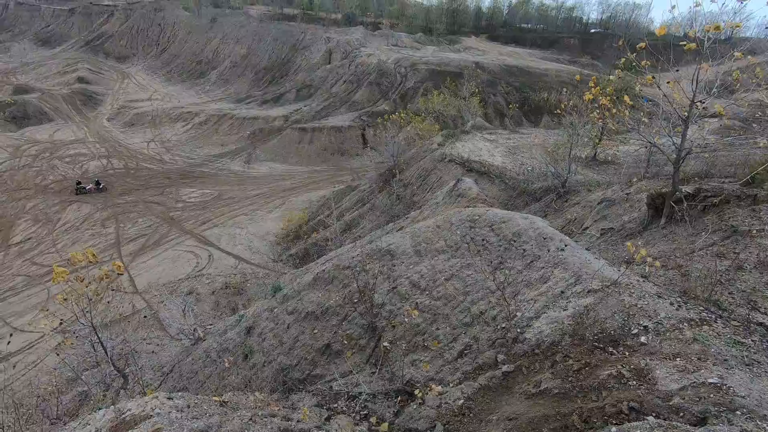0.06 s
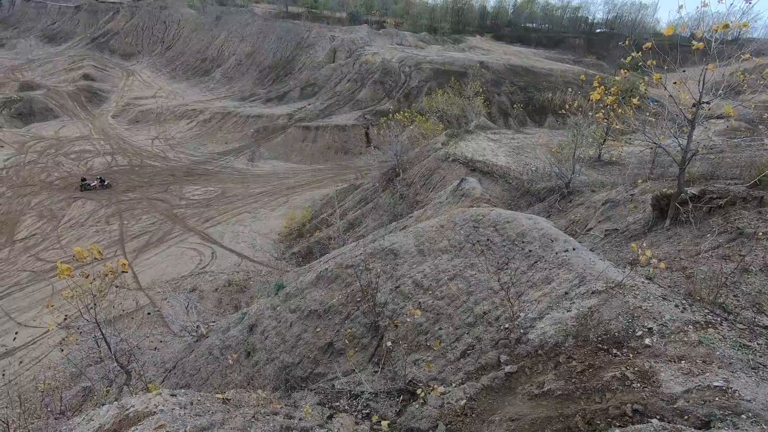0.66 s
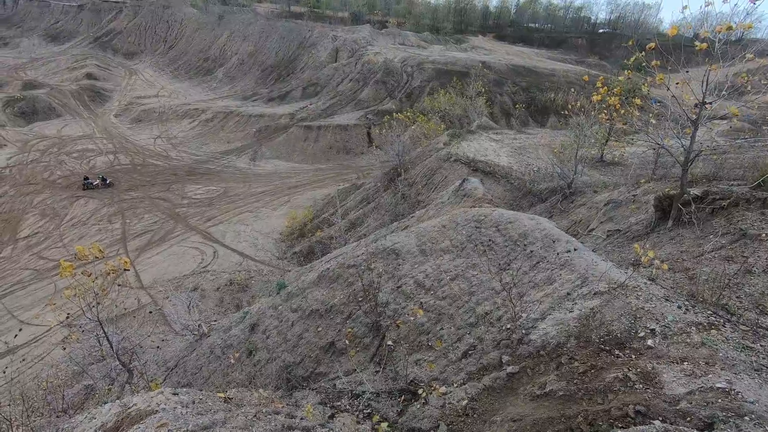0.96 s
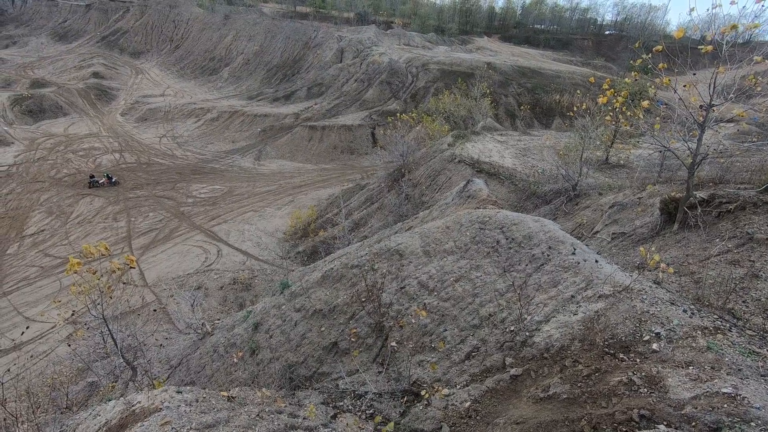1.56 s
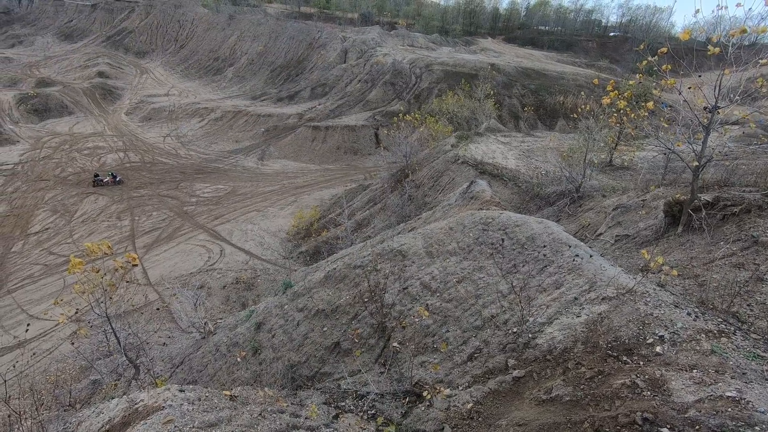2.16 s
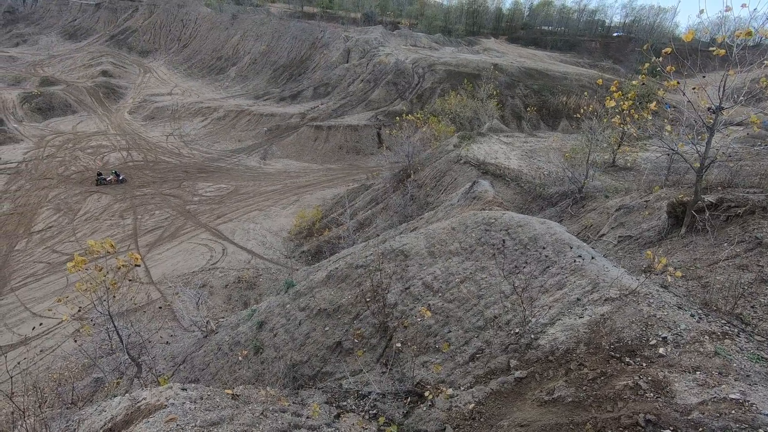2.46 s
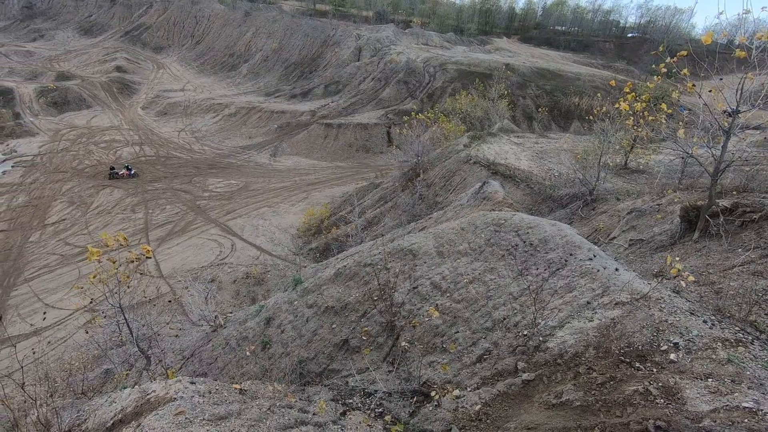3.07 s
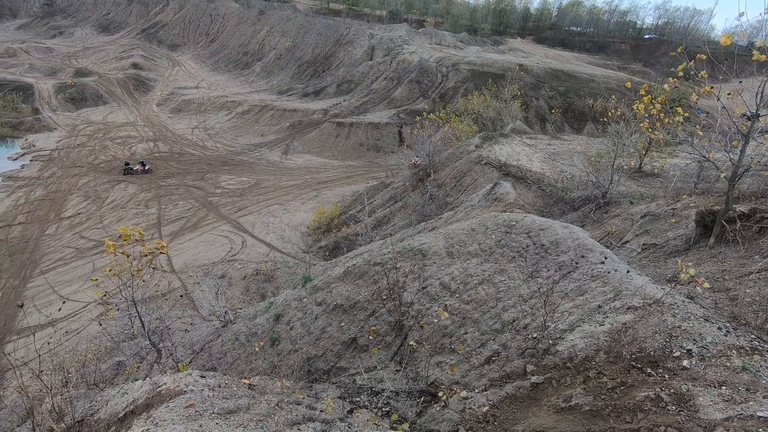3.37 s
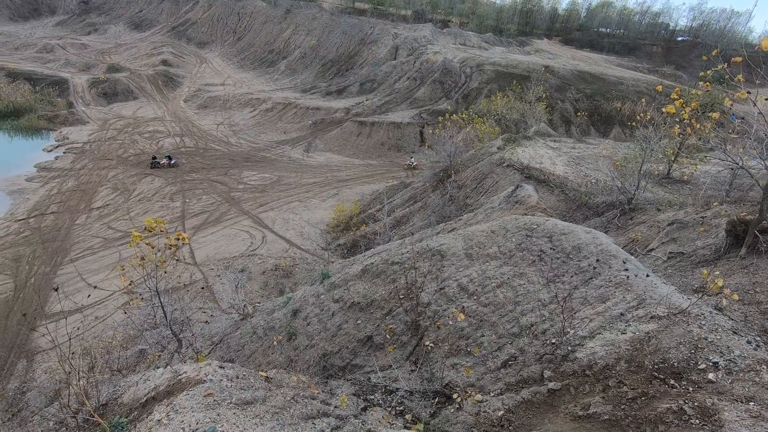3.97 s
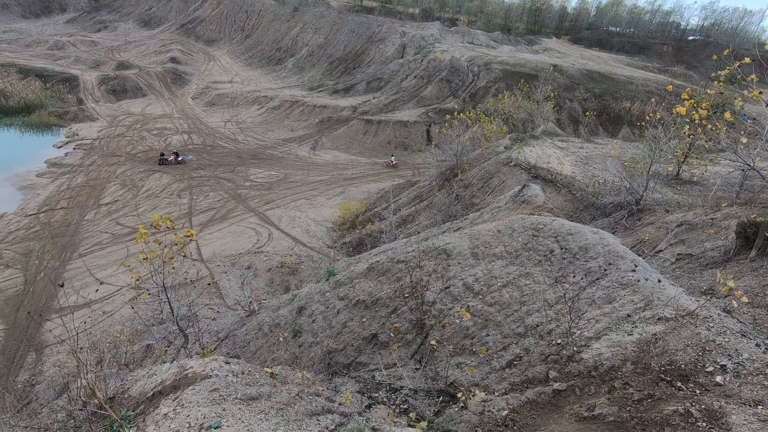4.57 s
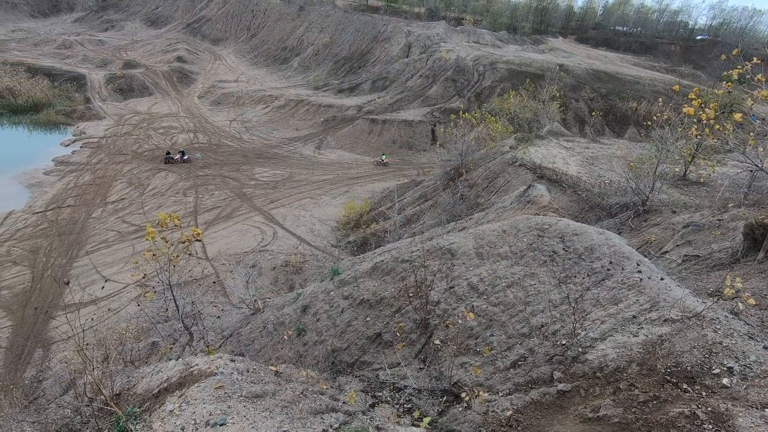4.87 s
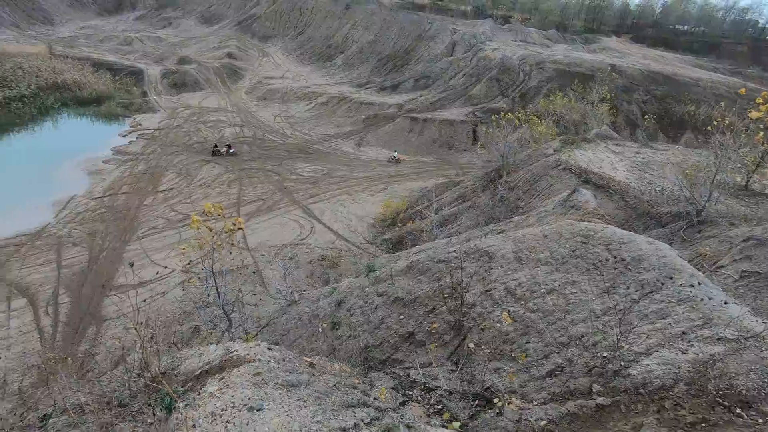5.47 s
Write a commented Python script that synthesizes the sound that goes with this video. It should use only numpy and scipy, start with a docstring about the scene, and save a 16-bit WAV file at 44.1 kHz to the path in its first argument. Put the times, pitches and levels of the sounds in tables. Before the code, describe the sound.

Low, gusty wind rumbles and flutters on the microphone throughout, above an open sand pit. A distant dirt bike putters on the right, its rapid pops echoing lightly off the slopes, then drops away at about 1.3 seconds. A quad, also on the right, sputters briefly around 1.5 seconds. The bike revs up near 2.2 seconds, along with one tiny clink of stone on metal. From 2.4 to 3.3 seconds the quad returns with uneven, nasal barks, bogging down and rattling on. From about 3.3 seconds the bike gives a string of quick throttle blips, its pitch wavering. It grows louder and raspier from 4 seconds, with brief metallic rings in the exhaust, blares hardest around 5.3 seconds and cuts for an instant near 5.5. Underneath, a far-off buggy's muffled hum fades in and out.

```python
"""A dirt bike putters and revs far below in a sand pit, while wind rumbles on the microphone.
Each time an engine fires, one sharp pop rings in its exhaust pipe and scatters off the sandy slopes.
Blips of the throttle speed the bike up; under load its pops harden and wake metallic rings.
A quad joins in twice, a stone clinks once and a buggy hums further off.
The bike and quad are to the right, so the camera's body shields the left microphone from them."""
import sys
import numpy as np
from scipy import signal
from scipy.fft import rfft, irfft, next_fast_len
from scipy.io import wavfile
from scipy.ndimage import uniform_filter1d, map_coordinates

SR = 44100
rng = np.random.default_rng(int(sys.argv[2]) if len(sys.argv) > 2 else 0)


def dump(signal):
    """Clip the signal to [-1, 1] and save it as 16-bit WAV at the path in sys.argv[1]."""
    limited = np.clip(np.atleast_2d(signal).T, -1, 1)
    pcm = np.round(limited * 32767).astype(np.int16)
    wavfile.write(sys.argv[1], SR, pcm)


N = 247842


def bike():
    """One cylinder: soft booms at light throttle; under load each sharp pop blares and rasps."""
    # engine speed before blips: time_s, firings_per_s
    speed = [(0.0, 50.8), (0.35, 52.35), (0.6, 50.25), (0.72, 51.47), (0.9, 49.55), (1.05, 50.78),
             (1.25, 52.87), (1.95, 51.56), (2.8, 56.51), (3.1, 59.97), (3.47, 58.07), (3.75, 59.22),
             (3.97, 58.01), (4.1, 55.1), (4.28, 52.62), (4.6, 53.01), (5.05, 52.81), (5.62, 52.49)]
    # brief twists of the throttle: peak_s, length_s, extra_firings_per_s
    blips = [(2.193, 0.448, 15.141), (3.347, 0.235, 10.628), (3.613, 0.277, 7.292), (3.855, 0.186, 3.398),
             (4.018, 0.13, 3.0), (4.168, 0.144, 1.721), (4.357, 0.156, 2.506), (4.456, 0.166, 4.763),
             (4.77, 0.339, 3.931), (5.34, 0.568, 3.888)]
    # the pipe's own note: time_s, pitch_hz
    pipe_note = [(0, 716), (.3, 558), (.6, 605), (.85, 680), (1.25, 676), (1.8, 1107), (2.3, 869),
                 (3.4, 790), (3.75, 646)]
    # how hard the engine works: time_s, boom_db, treble_over_boom_db
    effort = [(0, -46.5, -2), (.17, -51.5, 0), (.3, -43, -5), (.5, -41, -6), (.7, -39.5, -9),
              (.85, -36.5, -14), (1.04, -38, -10), (1.235, -42, -13.5), (1.28, -64, 1.5),
              (1.6, -57.5, -9.5), (1.85, -56.5, -26), (2.1, -44, -19.5), (2.35, -41.5, -14.5),
              (3.4, -41, -17), (3.62, -37, -16.5), (3.78, -36, -15.5), (4.06, -33, -8), (4.28, -37, -9),
              (4.5, -34.5, -8.5), (4.65, -37.5, -7.5), (4.8, -37, -10.5), (5, -37, -10.5),
              (5.32, -33, -5.5), (5.62, -38, -8.5)]
    # throttle: time_s, opening (0 light, 1 loaded, 2 wide open), upper_notes_db
    throttle = [(3.3, 0.059, -0.5), (3.68, 0.65, -2.5), (3.8, 1.18, -3), (4.1, 0.8, -1.5), (4.5, 0.59, 4),
                (4.75, 1.19, 2), (5.02, 1.14, 0.5), (5.17, 2, 1), (5.42, 1.5, 0), (5.62, 2.16, -4.5)]
    # tone colours of a pop's four parts, dull to sharp: pitch_hz, level_db
    boom_tone = [(300, -26.5), (450, -1), (570, 5.5), (950, 1), (1170, 2.5), (1400, -19.5), (3000, -32.5)]
    honk_tone = [(400, -20.5), (800, -8), (1130, 3.5), (1400, 2.5), (1700, -4.5), (3000, -26)]
    rasp_tone = [(1200, -22.5), (2000, 0), (2400, 0), (3200, -6.5), (3900, -6.5), (4600, -11.5),
                 (6000, -22.5), (8000, -44.5)]
    sizzle_tone = [(2500, -22.5), (4300, -3), (5000, 1), (6000, 0), (6700, -7), (7400, -10), (8300, -40)]
    effort_db, hard_db = curves(effort)
    opening, upper_db = curves(throttle)
    light, loaded, wide = (np.clip(1 - np.abs(opening - state), 0, 1) for state in range(3))
    cut = bump(peak_s=5.468, length_s=.115)  # the rider snaps the throttle shut for an instant
    surge = sum(extra * bump(s, length) for s, length, extra in blips)
    full_load_db, blip_dip_db = -31.5, -2
    load = np.minimum(amp(effort_db - full_load_db), 1)
    blip_db = blip_dip_db * load * sum(bump(s, length) for s, length, _ in blips)
    level_db = effort_db - 14 * cut
    soft_db = level_db + 0.15 * blip_db
    sharp_db = level_db + hard_db + blip_db
    gain = lambda db, sharp_share: amp(db + soft_db + sharp_share * (sharp_db - soft_db))
    fired = firings(curves(speed)[0] + surge - 13 * cut, jitter_s=.00004)
    pipe_hz = curves(pipe_note)[0][fired.astype(int)] * (1 + 0.0025 * rng.standard_normal(len(fired)))
    boom = amp(soft_db) * ring(booms(fired, pipe_hz, cycles=0.65, scatter_db=1.7), boom_tone)
    released = fired + .0012 * SR  # the gas bursts out as the boom peaks
    honk = ring(pops(released, pipe_hz, echo=0.27, scatter_db=3), honk_tone)
    honk *= gain(db=-8, sharp_share=0.75)
    pulses = -pops(released, pipe_hz, echo=0, scatter_db=1.56, count=1)
    blare = amp(soft_db) * pipe_blare(pulses, loaded, wide, upper_db)
    gas = pops(released, pipe_hz, echo=0.72, scatter_db=2.9)
    crack = ring(pulses, rasp_tone)
    rasp = gain(db=-3.5, sharp_share=0.88) * (jet(gas, rasp_tone, life_s=0.001) + crack)
    sizzle = gain(db=-10, sharp_share=0.84) * jet(gas, sizzle_tone, life_s=0.001)
    return light * (boom + honk) + blare + rasp + sizzle + metallic_rings(gas)


def pipe_blare(pulses, loaded, wide, upper_db):
    """Sharp pulses ring many of the pipe's notes at once; upper_db lifts or lowers the high ones."""
    # the pipe's notes under load and wide open: pitch_hz, level_db
    loaded_tone = [(250, -24.5), (450, -9.5), (590, 2), (720, 0.5), (810, -5.5), (890, -1.5), (1000, -17),
                   (1200, -3.5), (1390, -10), (1500, -7), (1650, -14), (1850, -9), (2200, -16.5),
                   (3000, -29.5), (7000, -40.5)]
    wide_tone = [(250, -25), (450, -9), (600, 1), (700, -3.5), (820, -18), (1050, -1), (1200, -2),
                 (1400, -15.5), (1650, -4.5), (1880, -6.5), (2150, -12.5), (2500, -21.5), (7000, -39)]
    notes = amp(3) * loaded * ring(pulses, loaded_tone) + amp(4.5) * wide * ring(pulses, wide_tone)
    upper = filtered(notes, lambda hz: hz ** 8 / (hz ** 8 + 1000 ** 8))
    return notes + (amp(upper_db) - 1) * upper


def metallic_rings(pulses):
    """As the load shifts, gas puffs wake one note of the exhaust after another: a growl, a ring."""
    # spells of ringing: peak_s, length_s, pitch_hz, width_hz, level_db
    spells = [(0.363, 0.75, 2330, 500, -52.5), (.52, .26, 3850, 900, -49.5), (0.663, 0.41, 3920, 900, -48),
              (0.75, 0.27, 2820, 397, -48.5), (2.02, .75, 1114, 130, -55), (4.17, 0.44, 882, 89, -41.5),
              (4.758, .26, 1830, 504, -45.5), (3.615, 0.47, 3930, 706, -55.5),
              (3.82, 0.23, 3890, 910, -48.5), (4.093, 0.31, 5340, 1600, -48.5),
              (4.449, 0.34, 5670, 1010, -51.5), (4.455, .13, 3600, 1520, -43.5),
              (4.777, .24, 2900, 1200, -44.5), (5.61, .12, 3690, 700, -44)]
    out = np.zeros(N)
    for s, length, hz, width_hz, db in spells:
        b, a = signal.iirpeak(hz, hz / width_hz, SR)
        tone = signal.lfilter(b, a, signal.lfilter(b, a, puffs(pulses, life_s=.0004)))
        out += amp(db) * bump(s, length) * unit(tone)
    return out


def quad():
    """A slower engine with uneven, nasal pops: it sputters once, then barks, bogs down and rattles on."""
    # engine speed: time_s, firings_per_s
    speed = [(1.411, 46.06), (1.534, 43.35), (2.367, 46.58), (2.521, 52.07), (2.623, 42.08), (2.716, 46.75),
             (2.92, 29.51), (3.157, 42.87), (3.334, 48.35)]
    # how hard the engine works: time_s, boom_db, bark_db
    effort = [(1.42, -54, -54), (1.6, -47, -44), (2.36, -39, -50), (2.55, -39, -45), (2.68, -44, -37),
              (2.75, -42.5, -43), (2.8, -42, -37), (2.86, -40, -42.5), (2.93, -45.5, -45), (3, -40.5, -40),
              (3.07, -44, -44.5), (3.135, -44, -42), (3.22, -40.5, -48.5), (3.33, -49, -49)]
    # two bursts of throttle: start_s, end_s
    bursts = [(1.418, 1.628), (2.365, 3.34)]
    # tone colours of a pop's three parts, dull to sharp: pitch_hz, level_db
    boom_tone = [(250, -24.5), (450, -11), (620, 4.5), (780, 5), (1050, -1), (1400, -27), (3000, -46.5)]
    bark_tone = [(700, -30.5), (1300, -2), (1600, 6.5), (1950, 4.5), (2400, -3), (3200, -13.5),
                 (6000, -33.5)]
    rasp_tone = [(1200, -32.5), (2400, 13.5), (3200, 6.5), (3900, 6), (4800, 3.5), (6000, -1.5),
                 (7000, -14.5), (8200, -44)]
    t = np.arange(N) / SR
    boom_db, bark_db = curves(effort)
    fired = np.maximum(firings(curves(speed)[0], jitter_s=0.0003) - .0008 * SR, 0)
    pipe_hz = 590 * (1 + 0.071 * rng.standard_normal(len(fired)))
    boom = ring(pops(fired, pipe_hz, echo=0.47, scatter_db=1.1), boom_tone)
    gas = pops(fired, pipe_hz, echo=0.75, scatter_db=1.1)
    bark = unit(ring(gas, bark_tone) + amp(-1) * jet(gas, bark_tone, life_s=0.0008))
    rasp = jet(gas, rasp_tone, life_s=0.0012)
    is_open = sum(1. * (t > start) * (t < end) for start, end in bursts)
    throttle = uniform_filter1d(is_open, size=900)
    return throttle * (amp(boom_db) * boom + amp(bark_db) * (bark + amp(-8) * rasp))


def firings(rate, jitter_s):
    """The moments, in samples, at which an engine fires, each slightly early or late."""
    count = np.cumsum(rate) / SR
    fired = np.interp(np.arange(1, int(count[-1]) + 1), count, np.arange(N))
    return np.clip(fired + jitter_s * SR * rng.standard_normal(len(fired)), 0, N - 1)


def booms(fired, pipe_hz, cycles, scatter_db):
    """Each firing sounds the pipe's lowest note, which swells and dies within a few cycles."""
    age = np.arange(SR // 50)
    turns = pipe_hz[:, None] * age / SR
    size = amp(scatter_db * rng.standard_normal((len(fired), 1)))
    bursts = size * np.sin(2 * np.pi * turns) * turns * np.exp(-turns / cycles)
    where = np.round(fired).astype(int)[:, None] + age
    return np.bincount(where.ravel(), bursts.ravel(), N)[:N]


def pops(fired, pipe_hz, echo, scatter_db, count=4):
    """One pulse a firing, followed by its weakening round trips in the pipe."""
    size = amp(scatter_db * rng.standard_normal(len(fired)))
    trips = np.arange(count)[:, None]
    where = np.round(fired + trips * SR / pipe_hz).astype(int)
    heights = size * echo ** (trips * (trips + 1) / 2)
    return np.bincount(where.ravel(), heights.ravel(), N)[:N]


def puffs(pulses, life_s):
    """Each pop drives a short, hissing puff of gas."""
    t = np.arange(SR // 50) / SR
    return signal.fftconvolve(pulses, np.exp(-t / life_s))[:N] * rng.standard_normal(N)


def jet(pulses, tone, life_s):
    """The puffs of gas, coloured by the exhaust pipe."""
    return ring(puffs(pulses, life_s), tone)


def wind():
    """Slow buffets, quicker flutter and fine swirls on the microphone, over the hush of the pit."""
    # wind strength and flutter strength: time_s, level_db
    strength = [(0, -1), (.82, -4.5), (1, 3.5), (1.35, -1.5), (1.6, 4), (1.9, -5), (2.4, 0.5), (3.1, 1.5),
                (3.6, -1.5), (3.85, -5), (4.13, 4), (4.7, 1), (5.42, 0), (5.62, -1)]
    flutter_level = [(0, -26.5), (1.4, -24), (2.3, -25.5), (3.1, -22), (3.7, -25), (4.2, -30.5),
                     (4.65, -26.5), (5, -23.5), (5.62, -27.5)]
    # brief lulls: middle_s, depth_db
    lulls = [(.19, 8), (1.25, 2.5), (1.86, 5.5), (2.31, 3), (3.45, 4.5), (3.68, 0), (4.3, 7.5),
             (4.709, 5.5), (5.51, 3)]
    # gusts that stir up swirls: peak_s, boost_db
    gusts = [(0.152, 5), (.5, 4), (0.901, 2.5), (1.7, 3.5), (2.619, 7.5), (3.78, 6.5), (4.552, 7.5), (5, 4)]
    # tone colours of the wind's three parts and the open air: pitch_hz, level_db
    buffet_tone = [(8, -25.5), (20, -15), (33, -0.5), (60, 2), (78, -4), (105, -13.5), (160, -32.5),
                   (400, -87.5)]
    flutter_tone = [(50, -16.5), (95, 7), (145, 2.5), (175, -9.5), (250, -19), (500, -75.5)]
    swirl_tone = [(100, -13.5), (190, 1), (250, -4.5), (320, -7.5), (420, -14), (560, -30.5), (1200, -50.5),
                  (3000, -88.5)]
    air_tone = [(200, -10), (600, -0.5), (1100, -3.5), (2000, -10.5), (4000, -19.5), (6200, -23.5),
                (7100, -31), (7900, -61.5)]
    strength_db, = curves(strength)
    lull_db = sum(db * bump(s, length_s=0.14) for s, db in lulls)
    gust_db = sum(db * bump(s, length_s=0.44) for s, db in gusts)
    gust_db -= 0.25 * np.arange(N) / SR  # the swirls slowly ease off
    blow = lambda db, follows, waver_db: amp(
        db + follows * (strength_db - lull_db) + waver_db * wobble(9.3))
    buffet = blow(db=-18, follows=0.83, waver_db=2.4) * eddies(buffet_tone, side_db=-21, evenness=0.89)
    flutter_db = curves(flutter_level)[0] - 0.74 * lull_db
    flutter = amp(flutter_db) * eddies(flutter_tone, side_db=-18.5, evenness=1)
    swirl_gain = blow(db=-37.5, follows=0.4, waver_db=0.37) * amp(gust_db)
    swirl = swirl_gain * eddies(swirl_tone, side_db=-6.5, evenness=0.18)
    air = amp(-49.5) * np.array([noise(air_tone), noise(air_tone)])
    return buffet + flutter + swirl + air


def eddies(tone, side_db, evenness):
    """Wind noise, much the same left and right, with its strongest swells flattened."""
    middle = noise(tone)
    swell = np.sqrt(np.abs(uniform_filter1d(middle ** 2, size=3000)) + 1e-6)
    middle = unit(middle / swell ** evenness)
    side = amp(side_db) * noise(tone)
    return np.array([middle + side, middle - side])


def clink():
    """A small stone is flung against metal and rings briefly."""
    start_s, pitch_hz, fade_s, level_db = 2.148, 2850, .03, -41
    age_s = np.maximum(np.arange(N) / SR - start_s, 0)
    return amp(level_db - 60 * age_s / fade_s) * np.sin(2 * np.pi * pitch_hz * age_s)


def buggy():
    """A muffled engine far off: only its lowest tones arrive, fading in and out on the wind."""
    # the cruising engine's hum: time_s, pitch_hz, level_db
    cruise = [(0, 134.8, -26), (.5, 128.4, -31.5), (.9, 125.2, -26.5), (1.4, 116.9, -39.5),
              (2.2, 115.8, -40.5), (2.7, 117.3, -27.5), (3.1, 132.9, -33), (3.7, 129.3, -31),
              (4.2, 134.7, -29.5), (4.7, 143.5, -36.5), (5.62, 140.5, -35.5)]
    # the tones in the hum: pitch_multiple, level_db
    tones = [(1, 0), (1.5, -13), (2, -12)]
    hz, db = curves(cruise)
    phase = 2 * np.pi * np.cumsum(hz * (1 + .02 * wobble(25))) / SR
    hum = sum(amp(level + 2 * wobble(7)) * np.sin(multiple * phase + rng.uniform(0, 2 * np.pi))
              for multiple, level in tones)
    return amp(db - 0.5) * unit(hum)


def ground_scatter(x, count=16, fade_s=0.15):
    """Nearby sand scatters each pop's treble at once; the pattern drifts as the vehicles drive on."""
    t = np.arange(SR // 12) / SR
    paths = rng.standard_normal((count, len(t))) * amp(-60 * t / fade_s) * (t > .001)
    paths /= np.linalg.norm(paths, axis=1, keepdims=True)
    distance = np.abs(np.linspace(0, count - 1, N) - np.arange(count)[:, None])
    blend = np.sqrt(np.clip(1 - distance, 0, 1))  # each pattern fades into the next
    treble = filtered(x, lambda hz: hz ** 4 / (hz ** 4 + 950 ** 4))
    return amp(-3) * signal.oaconvolve(treble * blend, paths, axes=1).sum(0)[:N]


def pit_echo(x, block=4096):
    """The pit walls echo differently left and right, by paths that change as the vehicles drive on."""
    # how long the echo takes to fade by 60 dB: pitch_hz, fade_s
    fade_times = [(400, 0.029), (1500, 0.19), (6000, 0.57)]
    echoes = np.zeros((2, N + SR))
    for start in range(0, N, block):
        hz, t, hiss = signal.stft(rng.standard_normal((2, SR // 3)), SR, nperseg=256)
        fade = amp(-60 * t / along(fade_times, hz)[:, None])
        paths = signal.istft(hiss * fade, SR, nperseg=256)[1]
        paths *= amp(3) / np.linalg.norm(paths[0])
        echo = signal.fftconvolve(x[None, start:start + block], paths, axes=1)
        echoes[:, start:start + echo.shape[1]] += echo
    return echoes[:, :N]


def camera_shadow(x, lag_s=20.4 / SR):
    """Sound bends round the camera's body and reaches the left microphone later and weaker."""
    # left level compared with right: pitch_hz, level_db
    shadow = [(350, -2.5), (500, -1), (620, -7), (800, -20), (1050, -17), (1300, -6), (2000, -11),
              (2500, -25.5), (3300, -5), (4100, -12.5), (5200, -4.5), (6700, -4)]
    # how far the body shifts each wave: pitch_hz, phase_radians
    shift = [(350, -1.4), (430, -.6), (520, -2.5), (600, -3.5), (780, -3.5), (1000, -2), (1150, -0.15),
             (1600, -0.56), (2000, 0.82), (2400, -1.8), (2800, -1.7), (3300, -0.53), (4600, -1), (5300, 1),
             (7000, 5.5)]
    phase = lambda hz: along(shift, hz) - 2 * np.pi * hz * lag_s
    return filtered(x, lambda hz: amp(along(shadow, hz)) * np.exp(1j * phase(hz)))


def amp(db):
    """Decibels to gain."""
    return 10 ** (np.asarray(db) / 20)


def unit(x):
    """Scale to an average (rms) level of 1."""
    return x / np.sqrt(np.mean(x ** 2) + 1e-20)


def along(points, hz):
    """Read between (pitch_hz, value) points on a log pitch scale."""
    pitches, values = np.transpose(points)
    return np.interp(np.log(hz + 1), np.log(pitches + 1), values)


def curves(rows):
    """One value per sample for each column after the time."""
    times, *columns = np.transpose(rows)
    return [np.interp(np.arange(N) / SR, times, column) for column in columns]


def bump(peak_s, length_s):
    """A smooth rise from 0 to 1 and back."""
    return np.cos(np.pi * np.clip((np.arange(N) / SR - peak_s) / length_s, -.5, .5)) ** 2


def wobble(rate):
    """A smooth curve through `rate` random points a second."""
    return map_coordinates(rng.standard_normal(int(N * rate / SR) + 4), [np.arange(N) * rate / SR])


def filtered(x, response):
    """Scale and shift each frequency in x by response(hz)."""
    size = next_fast_len(N + SR // 2)
    return irfft(rfft(x, size) * response(np.fft.rfftfreq(size, 1 / SR)), size)[..., :N]


def noise(tone):
    """Noise of level 1 with the given tone colour."""
    return unit(filtered(rng.standard_normal(N), lambda hz: amp(along(tone, hz))))


def ring(x, tone, size=2048):
    """Give x a tone colour so that each pulse starts sharply and rings afterwards; level 1."""
    cepstrum = irfft(np.log(amp(along(tone, np.fft.rfftfreq(size, 1 / SR)))))
    cepstrum[1:size // 2] *= 2  # folding it in half puts all the ringing after the pulse
    cepstrum[size // 2 + 1:] = 0
    return unit(signal.fftconvolve(x, irfft(np.exp(rfft(cepstrum))))[:N])


def scene():
    """Bike, quad and stone on the right, with the pit's echo, the wind and the far buggy."""
    # strength of the echoes: time_s, level_db
    echo_level = [(0, -3.5), (.8, -6), (1.5, -1), (2.6, -5.5), (4, -7.5), (5, -7.5), (5.3, -10.5)]
    bike_sound, quad_sound = bike(), quad()
    # the quad is in direct view, so it echoes less
    scattered = amp(curves(echo_level)[0]) * (bike_sound + amp(-3.5) * quad_sound)
    right = bike_sound + quad_sound + clink() + ground_scatter(scattered)
    echo = amp([[-7], [0]]) * pit_echo(scattered)
    background = amp([[.25], [-.25]]) * (wind() + buggy())
    return np.array([camera_shadow(right), right]) + echo + background


def record(dry):
    """The camera cuts off the highest treble."""
    top_hz = 7700
    return filtered(dry, lambda hz: 1 / np.sqrt(1 + (hz / top_hz) ** 40))


dry = scene()
out = record(dry)
dump(out)
```